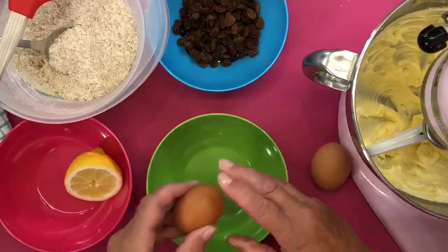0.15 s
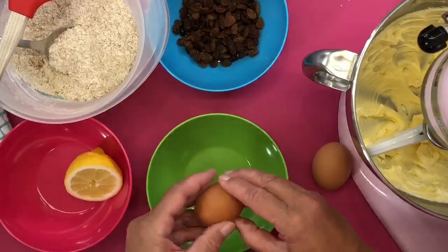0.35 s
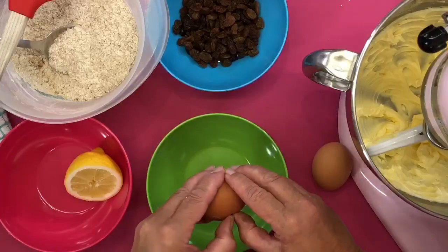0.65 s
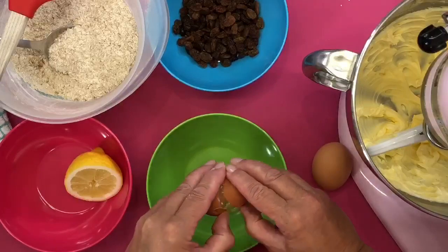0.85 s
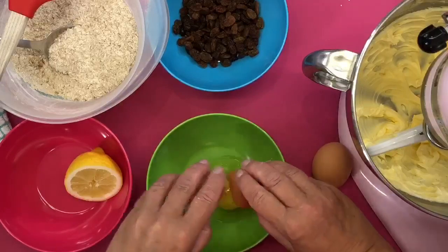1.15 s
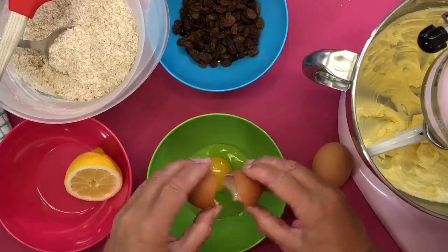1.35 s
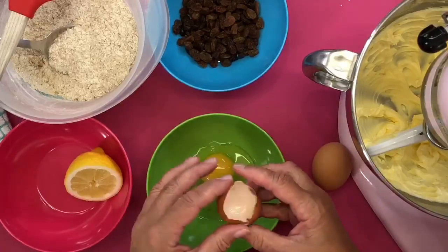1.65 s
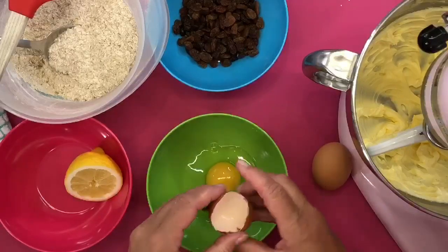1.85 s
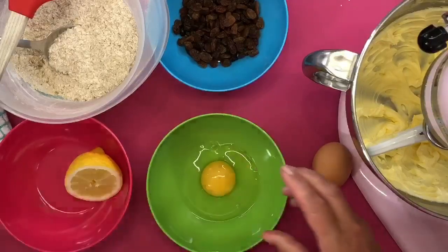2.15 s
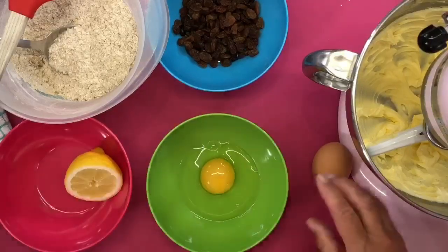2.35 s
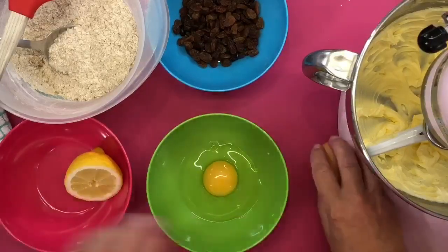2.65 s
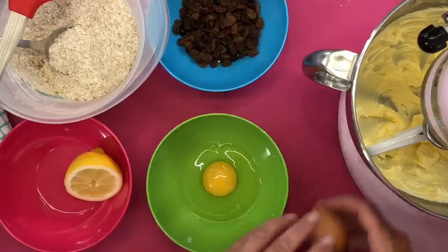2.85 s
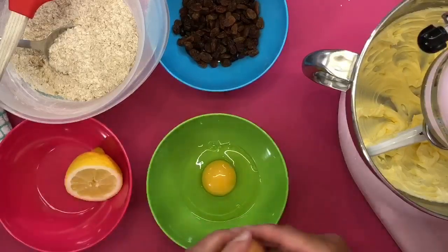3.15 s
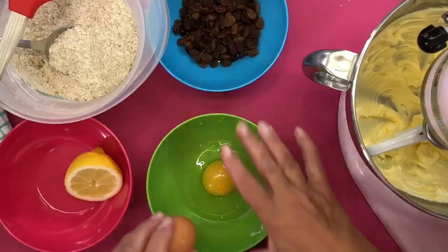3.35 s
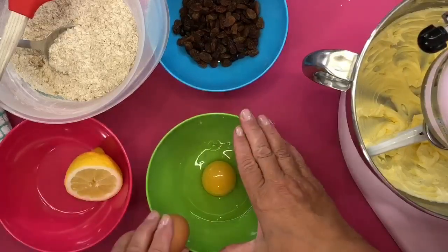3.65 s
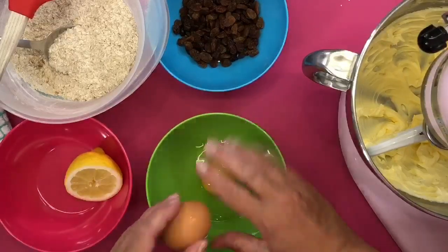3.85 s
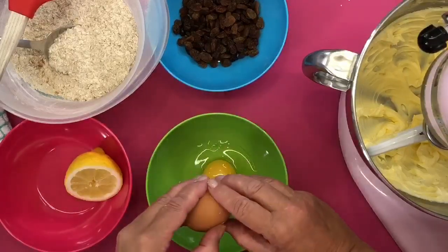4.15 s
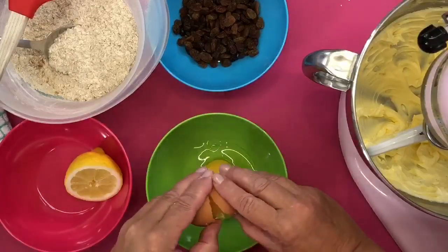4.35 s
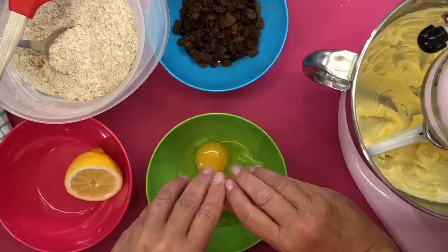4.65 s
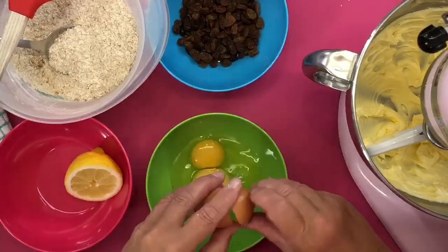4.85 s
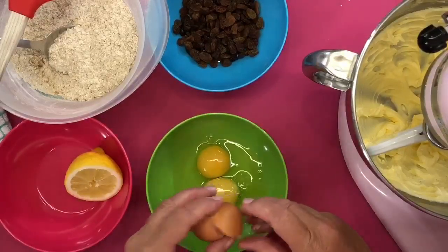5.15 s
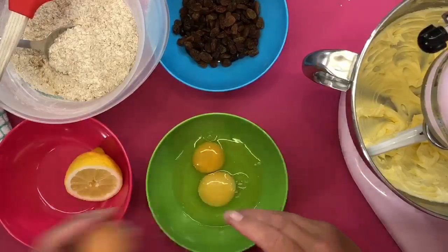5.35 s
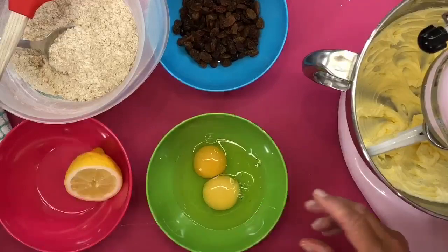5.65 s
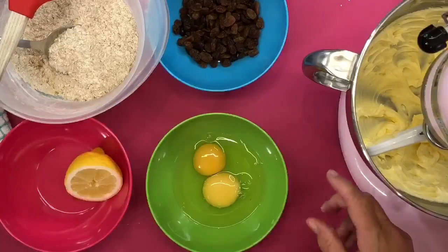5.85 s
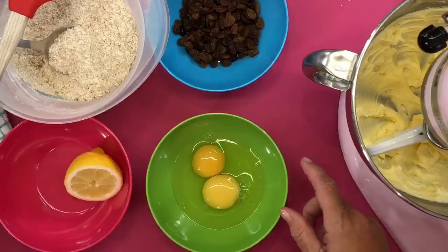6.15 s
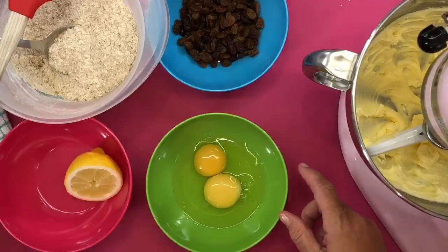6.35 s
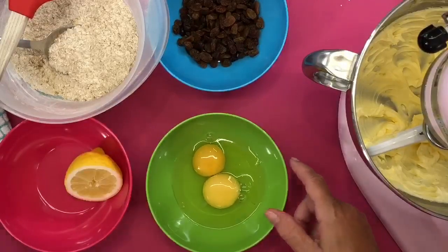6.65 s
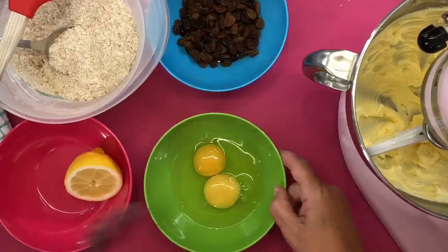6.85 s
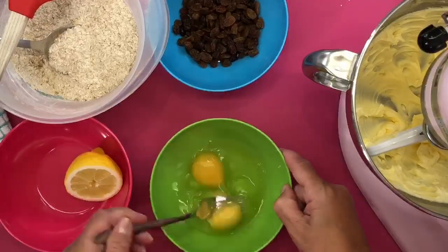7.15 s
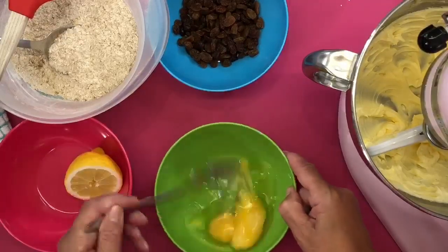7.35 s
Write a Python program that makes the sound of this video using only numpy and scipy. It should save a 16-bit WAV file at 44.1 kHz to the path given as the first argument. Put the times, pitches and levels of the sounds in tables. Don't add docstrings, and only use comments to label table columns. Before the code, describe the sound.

A fridge and fan hum low and steady, with a slight slow beat and faint hiss, in a hard-surfaced kitchen heard close up. At the start the ring of an egg knock just before is dying away. Faint shell ticks follow, a small snap at 0.9 s, then fine crunching and membrane tearing at 1.1-1.7 s. At 2.46 s the empty halves land with the loudest, sharp, hollow clack, with tiny bounces. Quiet until 3.63 s, when the second egg hits the rim with a short firm thud. Its shell snaps at 4.0-4.6 s and splits crisply at 4.9-5.1 s. The halves clatter at 5.84-5.97 s, with a dish clink, bumps, a soft hand slide and thin cutlery clinks to 6.4 s. A fork handle knocks the counter at 6.4 s. Metallic tine taps come at 7.12 and 7.28 s, then a stronger plastic bowl beat at 7.43 s with quick rebounds.

```python
import sys
import numpy as np
from scipy import signal
from scipy.fft import rfft, irfft, next_fast_len
from scipy.io import wavfile
from scipy.ndimage import uniform_filter1d

SR = 44100
rng = np.random.default_rng(int(sys.argv[2]) if len(sys.argv) > 2 else 0)


def persist_wave(psi):
    counts = np.round(np.clip(psi, -1, 1) * 32767).astype(np.int16)
    wavfile.write(sys.argv[1], SR, np.atleast_2d(counts).T)


def how_loud(loudness_db):
    steps = np.asarray(loudness_db, float) / 20
    return 10 ** steps


N = 330309
LEAD = SR // 4
TRAVEL_S = 0.00092

# pitch in Hz, level in dB per Hz.
FLAT = [(100, 0), (16000, 0)]

# pitch in Hz, level in dB per Hz.
HUM_COLOUR = [(15, -39.5), (25, -19), (47, -3), (70, -11), (99, -2.5), (130, -7.5), (242, -7.5), (270, -11),
              (363, -9.5), (416, -17.5), (1190, -20.5), (1840, -26.5), (2000, -28.5), (11600, -52),
              (16000, -72)]
# pitch in Hz, width in Hz, level in dB rms.
FAN_BANDS = [(161.6, 42, -68), (184, 69, -70), (1150, 250, -67.5)]
# time in seconds, level in dB.
RUMBLE = [(0.0, -63), (0.54, -55), (1.06, -67), (1.5, -62), (2.25, -69.5), (5.5, -69.5), (6.4, -63),
          (7.49, -61)]
# pitch in Hz, time to fall by 60 dB in seconds.
KITCHEN_T60 = [(150, 0.55), (500, 0.46), (1200, 0.52), (2500, 0.43), (5000, 0.44), (8000, .32),
               (12000, 0.3), (16000, 0.24)]
# pitch in Hz, width in Hz, boost in dB.
MICROPHONE = [(4970, 1100, -2), (5420, 480, 4.5), (6520, 380, 3.5), (8000, 710, -2.5), (9300, 700, 3),
              (12700, 1900, -1.5)]

# start in seconds, length in seconds, level in dB, pitch in Hz.
SLIDES = [
    (6.0, 0.24, -53, 1240),
    (6.256, .17, -64.5, 2900),
    (6.759, 0.13, -76, 3500),
    (5.85, 0.59, -59, 570),
]
# start in seconds, peak in dB, pitch in Hz, time to fall by 60 dB in seconds.
CLINK_MODES = [(5.886, -50, 1633, 0.306), (5.93, -52, 1640, .3), (6.178, -69, 8150, 0.095),
               (6.178, -69, 8450, 0.24), (6.178, -74, 9300, 0.047), (6.178, -55.5, 11150, 0.065),
               (6.178, -60, 13250, .12), (6.2, -76, 15000, 0.16), (6.26, -75, 11900, 0.76),
               (6.26, -80, 15500, .4), (6.325, -68, 13400, 0.39), (6.41, -71, 11100, .6),
               (6.41, -64, 13300, .4)]

# time in seconds, peak in dB.
PICKUP = [
    (6.405, -20),
    (6.411, -21.5),
    (6.424, -26.5),
    (6.44, -30.5),
    (6.779, -53),
]
# pitch in Hz, level in dB per Hz.
COUNTER_COLOUR = [(59, -54.5), (100, -22), (202, -3), (315, -18), (461, -5), (800, 0.5), (1010, -2),
                  (1550, -1), (3050, -11), (3780, -7.5), (6840, -14.5), (11600, -13.5), (16000, -27)]
# time in seconds, peak in dB, boost of the low tine mode in dB.
TAPS = [
    (7.1165, -20, 9.5),
    (7.2778, -20, -1.5),
    (7.366, -42.5, 0.5),
]
# pitch in Hz, width in Hz, level in dB.
TINE_MODES = [(1300, 126, -9), (1760, 320, -15), (2547, 99, -0.5), (2661, 32, 2), (3450, 45, -4.5),
              (4680, 58, -28), (5220, 205, -11), (5480, 172, -12.5), (5590, 167, 5.5), (6400, 100, -8),
              (6530, 87, 0), (8260, 73, -10.5), (8770, 83, -12), (10170, 150, -11.5), (10710, 246, -21),
              (11760, 110, -7), (13100, 340, -13.5), (15240, 290, -18), (6983, 16000, -26.5)]
LOW_TINE_HZ, LOW_TINE_WIDTH_HZ = 2770, 590
# time in seconds, peak in dB.
STROKE = [
    (7.4265, -14),
    (7.4344, -19),
    (7.4774, -24),
]
# pitch in Hz, width in Hz, level in dB.
BOWL_MODES = [(402, 83, -14), (1198, 29, -5), (1500, 68, -1), (1700, 110, 0.5), (1980, 92, -4.5),
              (2665, 370, -3.5), (2730, 140, 4), (3250, 310, -17.5), (5610, 560, -5), (6960, 430, -6.5),
              (8080, 240, -15), (9300, 360, -11.5), (11730, 580, -13), (13400, 650, -24),
              (15000, 1500, -23.5)]

# time in seconds, peak in dB.
DROP_ONE = [
    (2.435, -38.5),
    (2.458, 4),
    (2.464, -9.5),
    (2.468, -6),
]
# pitch in Hz, level in dB per Hz.
DROP_ONE_COLOUR = [(88, -47.5), (150, -20.5), (361, -12.5), (675, -12.5), (1120, -0.5), (1420, -8),
                   (2140, 7), (3290, -4.5), (4670, -23.5), (5790, -7), (7770, -20.5), (9440, -20.5),
                   (12900, -26), (16000, -55)]
# time in seconds, peak in dB.
DROP_TWO = [
    (5.842, -18.5),
    (5.884, -5),
    (5.888, -8.5),
    (5.897, -11),
    (5.929, -19),
    (5.96, -32.5),
    (5.975, -31),
]
# pitch in Hz, level in dB per Hz.
DROP_TWO_COLOUR = [(88, -56.5), (150, -32), (222, -28), (504, -24), (578, -21), (790, -31.5), (998, -20.5),
                   (1310, -29), (1600, -10.5), (2810, -15), (3220, -8.5), (3770, -16), (5460, -15),
                   (16000, -37)]
# time in seconds, peak in dB, pitch in Hz.
BUMPS = [
    (5.995, -20, 1900),
    (5.996, -29.5, 900),
    (6.123, -35, 900),
    (6.149, -35.5, 630),
    (6.408, -35, 570),
]
# time in seconds, peak in dB, pitch in Hz.
HOLLOWS = [(2.46, -13, 3150), (2.461, -14.5, 5800), (2.525, -18, 1760), (2.547, -24.5, 4700),
           (2.8, -47, 630), (3.632, -24.5, 1160), (3.8, -53, 1350), (4.033, -51, 4040), (4.427, -42, 3800),
           (5.091, -41, 3755), (5.324, -44, 1500), (5.848, -18, 1907), (4.349, -40, 1300), (-.1, -27, 1150),
           (2.462, -14, 2694), (5.988, -28, 2060), (7.155, -46, 4280), (1.65, -53, 2300), (1.69, -44, 1940),
           (3.63, -29.5, 175.6), (6.407, -40, 187)]

# peak time in seconds, peak in dB, fade in dB per second.
TEARS = [(1.149, -45.5, 500), (1.213, -41, 284), (1.577, -55, 104), (1.605, -40.5, 860), (1.63, -51.5, 36),
         (4.344, -37.5, 600), (4.423, -40, 460), (4.912, -36.5, 254), (5.092, -47, 296.5)]
# pitch in Hz, width in Hz, level in dB.
CRACKLE = [(880, 200, -6.5), (1930, 490, 7.5), (3540, 1500, 0.5), (6440, 2300, -4), (9400, 4200, -8),
           (13000, 3600, -14.5)]
# time in seconds, peak in
# dB, shell ring in Hz, bright tick in dB above the ring.
SNAPS = [(0.5924, -49, 3200, 0.5), (0.8714, -34, 2070, -0.5), (0.874, -45, 3700, -11),
         (0.875, -43, 6660, -13), (0.8944, -45, 1990, -6), (1.098, -54, 3080, -5),
         (1.1473, -58, 2230, -10), (1.1644, -59, 2030, 8), (1.2141, -37, 2500, -24),
         (1.2454, -40, 2800, -9), (1.4984, -56, 2730, -21), (1.5554, -54, 2250, -21),
         (1.575, -40.5, 2200, -30), (1.586, -37, 2050, -30), (1.594, -41.5, 3070, -24),
         (1.6021, -36.5, 2010, -33), (1.6124, -58, 2140, -19), (1.6427, -46, 1960, -8),
         (1.8267, -47.5, 2130, -16), (2.779, -44, 1750, -12),
         (4.217, -52.5, 2440, 0.5), (4.3434, -36.5, 2820, -20), (4.3844, -60, 2720, -12),
             (4.6334, -50, 4340, -23), (6.3103, -48, 1300, -15.5), (4.413, -47.5, 3800, -23)]
# time in seconds, peak in dB.
SPLITS = [(4.4255, -32.5), (4.4664, -62), (4.5542, -60.5), (4.907, -30.5), (4.9376, -30.5), (4.9532, -33.5),
          (4.9925, -38.5), (5.09, -37), (5.1196, -43)]
SPLIT_HZ, SPLIT_TICK_DB = 1490, -24
# time in seconds, peak in dB, bright part in dB above the crunch.
TICKS = [(0.2994, -52, -6), (0.4924, -72, 6), (0.6614, -68, 5), (1.1164, -47.5, 4), (1.1465, -41, -14.5),
         (1.2141, -61, 25), (1.2454, -60.5, 13.5), (1.556, -51, -4), (1.614, -65.5, 0.5), (1.644, -53, 4),
         (1.8255, -76, 24), (2.9494, -65.5, 2), (3.499, -78, 9.5), (3.9794, -62.5, 5.5),
         (4.0312, -48, -9.5), (4.1137, -70.5, 11), (4.2403, -46, -6), (4.3292, -48.5, -3),
         (4.3434, -54, 20), (5.1194, -66.5, 17.5), (5.789, -71, 1), (6.3594, -59, -1.5), (1.412, -76, 10),
         (4.9377, -46, 3), (5.0903, -59.5, -1), (2.4585, -40, 13)]
# time in seconds, peak in dB.
KNOCKS = [
    (-.12, -11.5),
    (3.6285, -7.5),
    (3.6365, -16),
]
# pitch in Hz, level in dB per Hz.
RIM_COLOUR = [(59, -24.5), (100, -11.5), (166, -7.5), (250, -16), (558, -18.5), (1150, -3.5), (1450, -14.5),
              (1760, -9), (2170, -17), (4470, -23.5), (5900, -17), (7290, -24.5), (9610, -23.5),
              (16000, -35)]


def rms_one(x):
    return x / np.sqrt(np.mean(x ** 2) + 1e-20)


def peak_one(x):
    return x / np.abs(x).max()


def at_hz(points, hz):
    return np.interp(np.log(hz), np.log(np.array(points)[:, 0]), np.array(points)[:, 1])


def resonance(x, hz, width_hz):
    r = np.exp(-np.pi * width_hz / SR)
    return signal.lfilter([(1 - r * r) / 2, 0, (r * r - 1) / 2],
                          [1, -2 * r * np.cos(2 * np.pi * hz / SR), r * r], x)


def twice(x, hz, width_hz):
    return resonance(resonance(x, hz, width_hz), hz, width_hz)


def body(x, modes):
    return sum((-1) ** k * how_loud(db) * resonance(x, hz, width) for k, (hz, width, db) in enumerate(modes))


def contact(crush_s, rise_s=.0003):
    t = np.arange(4096) / SR
    return rng.standard_normal(4096) * np.exp(-t / crush_s) * (1 - np.exp(-t / rise_s))


def damped(force, spectrum, smooth_hz=160):
    size = len(force)
    hz = np.maximum(np.arange(size // 2 + 1) * SR / size, 1)
    power = np.abs(rfft(force)) ** 2
    even = np.sqrt(uniform_filter1d(power, size=round(smooth_hz / hz[1])))
    wanted = how_loud(np.maximum(at_hz(spectrum, hz), -70))
    cepstrum = irfft(np.log(wanted / even), size)
    cepstrum[1:size // 2] *= 2
    cepstrum[size // 2 + 1:] = 0
    return irfft(rfft(force) * np.exp(rfft(cepstrum)), size)


def struck(force, modes):
    return body(damped(force, FLAT), modes)


def add(track, s, sound):
    i = round((s + TRAVEL_S) * SR) + LEAD
    track[i:i + len(sound)] += sound[:len(track) - i]


def blows(events, ring, shape, crush_s, rise_s, gain_db):
    out = np.zeros(N + LEAD)
    for s, db in events:
        sound = ring(contact(crush_s, rise_s), shape)
        add(out, s, how_loud(db + gain_db) * peak_one(sound))
    return out


def hum():
    size = next_fast_len(N)
    hz = np.maximum(np.arange(size // 2 + 1) * SR / size, 1)
    colour = how_loud(at_hz(HUM_COLOUR, hz)) / (1 + (hz / 14400) ** 24)
    broad = rms_one(irfft(rfft(rng.standard_normal(size)) * colour, size)[:N])
    white = rng.standard_normal(N + SR)

    def narrow(pitch_hz, width_hz):
        return rms_one(twice(white, pitch_hz, width_hz)[SR:])

    t = np.arange(N) / SR
    beat_db = 4.5 * np.cos(2 * np.pi * (t - 0.043) / 1.56)
    line = how_loud(-60.5 + beat_db) * np.sin(2 * np.pi * 100 * t)
    s, rumble_db = np.transpose(RUMBLE)
    rumble = how_loud(np.interp(t, s, rumble_db)) * narrow(58, 9.3)
    fan = sum(how_loud(db) * narrow(pitch, width) for pitch, width, db in FAN_BANDS)
    return how_loud(-56) * broad + line + rumble + fan


def kitchen(x):
    t = np.arange(SR * 3 // 4) / SR
    edges = np.geomspace(80, 18000, 17)
    white = rng.standard_normal((3, len(t)))
    fade = how_loud(-60 * t / .5)
    for k in range(2):
        even = damped(white[k] * fade, FLAT, smooth_hz=30.24)
        white[k] = even / fade * np.sqrt(np.sum(fade ** 2))
    tail = 0
    for k, (low, high) in enumerate(zip(edges, edges[1:])):
        split = signal.butter(2, [low, high], "band", fs=SR, output="sos")
        band = signal.sosfilt(split, white[k % 2])
        tail = tail + band * how_loud(-60 * t / at_hz(KITCHEN_T60, np.sqrt(low * high)))
    late = how_loud(-37.5) * tail * (1 - np.exp(-t / 0.0058))
    early = how_loud(-19) * white[2] * np.exp(-t / .0075) * (t > .0015)
    early[0] = 1
    response = 1.452 * (late + 0.8 * damped(early, FLAT, smooth_hz=90.2))
    return signal.fftconvolve(x, response)[LEAD:LEAD + N]


def slides():
    out = np.zeros(N + LEAD)
    for s, length, db, hz in SLIDES:
        size = round(length * SR)
        friction = rms_one(twice(rng.standard_normal(size), hz, 1.6 * hz))
        add(out, s, how_loud(db) * np.hanning(size) * friction)
    return out


def clinks():
    out = np.zeros(N + LEAD)
    t = np.arange(SR // 3) / SR
    for s, db, hz, t60 in CLINK_MODES:
        level = how_loud(db - 60 * t / t60) * (1 - np.exp(-t / 0.0014))
        add(out, s, level * np.sin(2 * np.pi * hz * t))
    return out


def fork_pickup():
    return blows(PICKUP, damped, COUNTER_COLOUR, crush_s=0.0073, rise_s=0.00049, gain_db=1.0)


def fork_taps():
    out = np.zeros(N + LEAD)
    for s, db, low_db in TAPS:
        ring = struck(contact(crush_s=0.0019, rise_s=0.0013), TINE_MODES)
        low = resonance(ring, LOW_TINE_HZ, LOW_TINE_WIDTH_HZ)
        add(out, s, how_loud(db - 2) * peak_one(ring + (how_loud(low_db) - 1) * low))
    return out


def bowl_stroke():
    return blows(STROKE, struck, BOWL_MODES, crush_s=0.001, rise_s=0.00033, gain_db=0.0)


def dropped_halves():
    first = blows(DROP_ONE, damped, DROP_ONE_COLOUR, crush_s=0.00067, rise_s=0.00027, gain_db=-2.5)
    second = blows(DROP_TWO, damped, DROP_TWO_COLOUR, crush_s=0.0024, rise_s=0.00032, gain_db=-2.0)
    return first + second


def hollows_and_bumps():
    out = np.zeros(N + LEAD)
    for rows, share in (HOLLOWS, 0.22), (BUMPS, 1.4):
        for s, db, hz in rows:
            ring = struck(contact(crush_s=0.0004), [(hz, share * hz, 0)])
            add(out, s, how_loud(db) * peak_one(resonance(ring, hz, 2 * share * hz)))
    return out


def tearing(per_s):
    t = (np.arange(N + LEAD) - LEAD) / SR
    swell_db_per_s, longest_s = 2500, 0.065
    level = 0
    for s, db, fade_db_per_s in TEARS:
        over = np.maximum(t - s - longest_s, 0)
        before_db = swell_db_per_s * (s - t)
        after_db = fade_db_per_s * (t - s) + swell_db_per_s * over
        level = level + how_loud(np.maximum(db - np.maximum(before_db, after_db), -200))
    happens = rng.random(N + LEAD) < per_s / SR
    size = how_loud(6.0 * np.minimum(rng.exponential(1, N + LEAD), 3.0))
    cracks = happens * size * rng.choice([-1, 1], N + LEAD)
    return how_loud(-9.5) * level * rms_one(body(cracks, CRACKLE))


def shell_edge(force, crunch_db, tick_db):
    crunch = how_loud(crunch_db) * peak_one(twice(force, 3100, 5600))
    tick = how_loud(tick_db + 3.5) * peak_one(twice(force, 10500, 15000))
    return crunch + tick


def snaps():
    out = np.zeros(N + LEAD)
    splits = [(s, db, SPLIT_HZ, SPLIT_TICK_DB) for s, db in SPLITS]
    for s, db, hz, tick_db in SNAPS + splits:
        force = damped(contact(crush_s=0.0013), FLAT)
        ring = how_loud(db - 0.5) * peak_one(twice(force, hz, 0.22 * hz))
        add(out, s, ring + shell_edge(force, db + 1 + 0.3 * tick_db, db + tick_db))
    for s, db, bright_db in TICKS:
        force = damped(contact(crush_s=.0012), FLAT)
        add(out, s, shell_edge(force, db, db + bright_db))
    return out


def egg_knocks():
    return blows(KNOCKS, damped, RIM_COLOUR, crush_s=0.0018, rise_s=0.0012, gain_db=3.5)


def scene():
    egg = egg_knocks() + dropped_halves()
    fork = fork_pickup() + fork_taps() + bowl_stroke()
    shell = snaps() + hollows_and_bumps() + tearing(per_s=710)
    near = kitchen(egg + fork + shell + slides() + clinks())
    return (near + hum())[None]


def low_pass(x):
    return signal.sosfilt(signal.butter(12, 16500, fs=SR, output="sos"), x)


def record(dry):
    x = dry
    for hz, width, db in MICROPHONE:
        x = x + (how_loud(db) - 1) * resonance(x, hz, width)
    x = signal.sosfilt(signal.butter(5, 44, "high", fs=SR, output="sos"), x)
    hiss = signal.sosfilt(signal.butter(8, 14300, fs=SR, output="sos"), rng.standard_normal(x.shape))
    x = x + how_loud(-79) * hiss
    x = signal.sosfilt(signal.butter(2, 14500, fs=SR, output="sos"), x)
    ahead = np.arange(1024, 0, -1) / SR
    smear = how_loud(-45.5) * rng.standard_normal(1024) * np.exp(-ahead / 0.005)
    x = x + signal.fftconvolve(x, smear[None])[:, -N:]
    return low_pass(np.clip(x, -.95, .95))


dry = scene()
out = record(dry)
persist_wave(out)
```